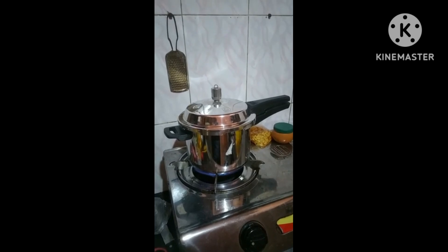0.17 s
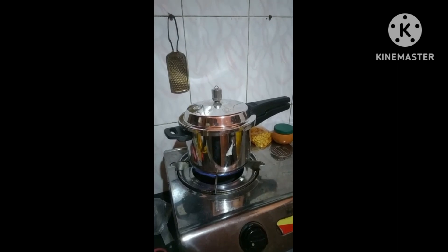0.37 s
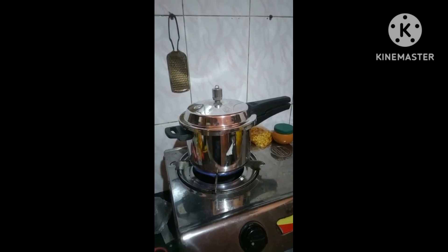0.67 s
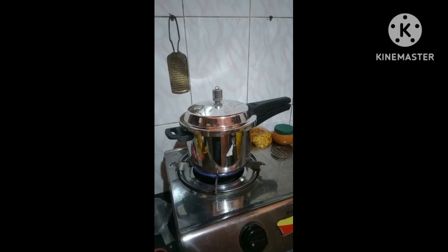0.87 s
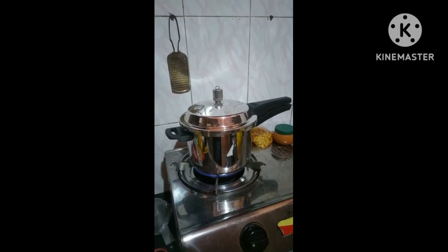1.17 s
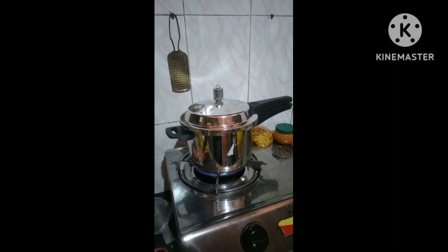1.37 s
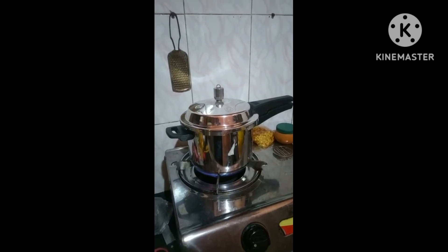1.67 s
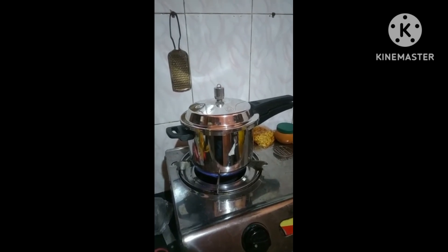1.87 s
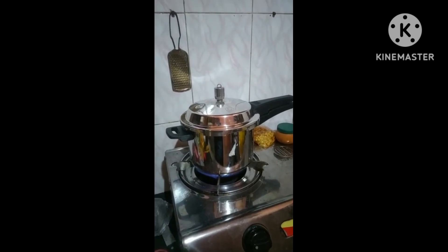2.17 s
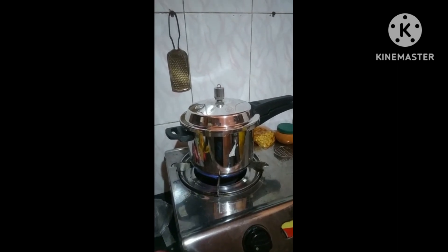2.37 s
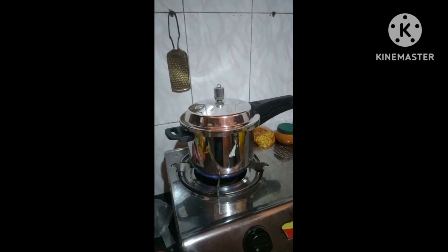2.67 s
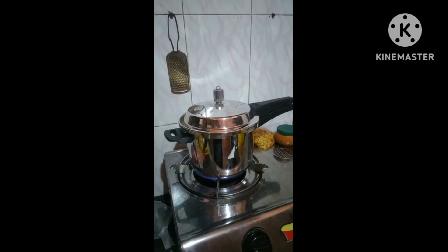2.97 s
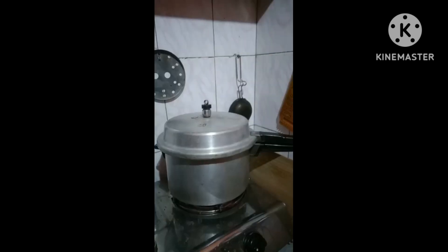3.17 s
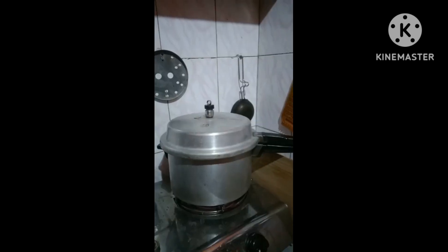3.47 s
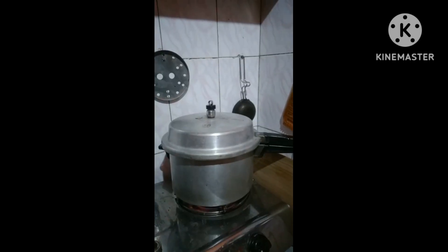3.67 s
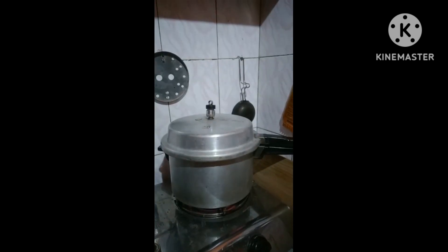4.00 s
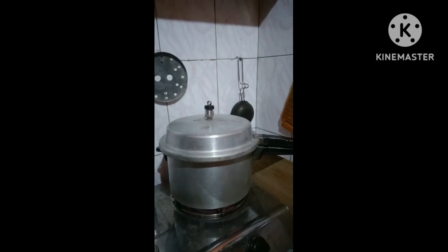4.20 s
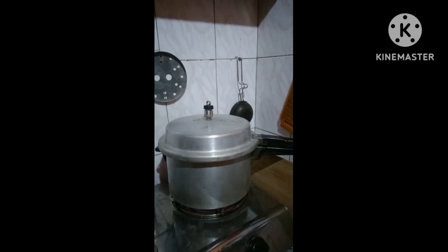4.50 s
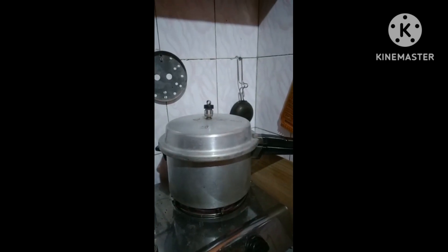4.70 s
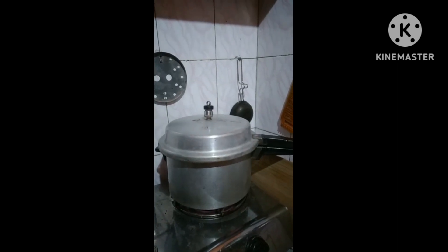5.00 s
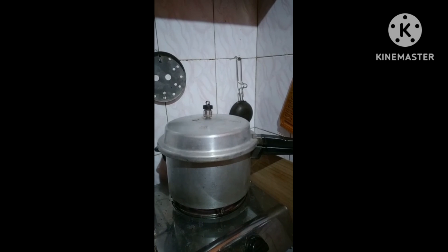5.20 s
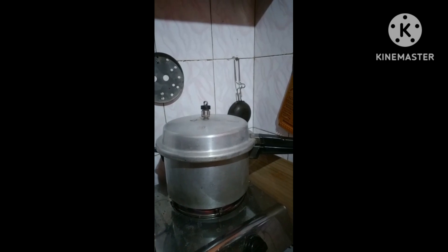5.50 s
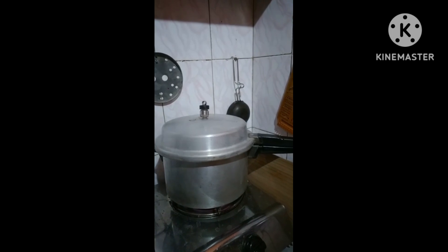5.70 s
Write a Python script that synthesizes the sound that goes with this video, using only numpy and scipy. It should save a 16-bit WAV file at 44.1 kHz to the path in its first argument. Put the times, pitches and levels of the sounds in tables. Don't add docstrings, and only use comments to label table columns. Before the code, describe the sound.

Soft leaking steam in a kitchen, a short silent gap, then an overloaded one-second blast of steam from another cooker that clacks shut to a hiss.

```python
import sys
import numpy as np
from scipy import signal
from scipy.fft import rfft, irfft, next_fast_len
from scipy.io import wavfile
from scipy.ndimage import uniform_filter1d

SR = 44100
rng = np.random.default_rng(int(sys.argv[2]) if len(sys.argv) > 2 else 0)


def gain_from_db(level_db):
    decades = np.asarray(level_db, float) / 20
    return 10 ** decades


def waveform_to_disk(signal):
    frames = np.transpose(np.atleast_2d(signal))
    scaled = np.clip(frames, -1, 1) * 32767
    samples = np.round(scaled).astype(np.int16)
    wavfile.write(sys.argv[1], SR, samples)


N = 257984
T = np.arange(N) / SR
LEFT_LATE_S = 0.011
# start_s, end_s
SILENCE = (3.137, 3.479)


def unit(x):
    return x / np.sqrt(np.mean(x ** 2, axis=-1, keepdims=True) + 1e-20)


def along(points, hz):
    f, db = np.transpose(points)
    return gain_from_db(np.interp(np.log(hz + 1), np.log(f + 1), db))


def wobble(rate, channels=2):
    knots = rng.standard_normal((channels, 9000))
    return np.array([np.interp(T * rate, np.arange(len(k)), k) for k in knots])


def filtered(x, response):
    size = next_fast_len(N + 8192)
    hz = np.fft.rfftfreq(size, 1 / SR)
    return irfft(rfft(x, size) * response(hz), size)[..., :N]


def peaks(modes, hz):
    return np.sqrt(1 + sum(gain_from_db(2 * db) / (1 + (2 * (hz - c) / w) ** 2) for c, w, db in modes))


def bumps(rows):
    s, half, *db = np.transpose(rows)
    coarse = T[::64]
    bells = np.exp(-((coarse - s[:, None]) / half[:, None]) ** 2)
    swells = np.array(db) @ bells
    return np.array([np.interp(T, coarse, swell) for swell in swells])


def stages(levels_db, times):
    out = []
    for (first, leak, blow, rest), late in zip(levels_db, [LEFT_LATE_S, 0]):
        moments = np.add(times, [late, late, 0, 0])
        second = np.interp(T, moments, [leak, blow, blow, rest])
        out.append(np.where(T < SILENCE[0], first, second))
    return np.array(out)


def fades():
    fade_out = np.clip((3.157 - T) / 0.16, 0, 1) ** 1.15
    fade_in = np.clip((T - 3.452) / 0.28, 0, 1) ** 1.32
    return fade_out + fade_in


def hum(tones, unsteady_db):
    sines = sum(np.sqrt(2) * gain_from_db(db) * np.sin(2 * np.pi * hz * T) for hz, db in tones)
    return sines * gain_from_db(unsteady_db * wobble(5.6, channels=1))


# pitch_hz, width_hz, level_db
LEFT_CAVITY = [(5510, 2670, 11), (7060, 1400, 8)]
RIGHT_CAVITY = [(10320, 1400, 11.5), (11600, 1200, 1.3)]


def hiss(colour, flutter_db):
    slow = wobble(6.6, channels=1) + 0.68 * wobble(6.9, channels=1)
    flutter = gain_from_db(flutter_db * (slow + 0.38 * wobble(30)))

    def response(hz):
        return colour(hz) * np.array([peaks(LEFT_CAVITY, hz), peaks(RIGHT_CAVITY, hz)])

    return unit(flutter * filtered(rng.standard_normal((2, N)), response))


# pitch_hz, level_db (per Hz)
FIRST_JET = [(300, -12), (2000, 3.5), (4000, -3.5), (7000, -4.5), (10000, -2), (13000, -3), (16000, 0.5)]
# pitch_hz, width_hz, level_db
WEIGHT_WHISTLES = [(5278, 40, 5), (5735, 50, 9), (5810, 40, 4), (5915, 60, 6), (6003, 40, 4),
                   (6230, 140, 5), (6850, 80, 4), (7180, 90, 4)]


def whistling_valve():
    return hiss(lambda hz: along(FIRST_JET, hz) * peaks(WEIGHT_WHISTLES, hz) ** [[1], [.15]], flutter_db=.5)


# pitch_hz, level_db (per Hz)
LEFT_FOLD = [(15, -5), (100, -13.5), (400, -4), (1200, -1.5), (2000, -3.5), (2600, -8.5), (3300, -16.5),
             (6000, -19.5), (16000, -28)]
RIGHT_FOLD = [(15, -6.5), (100, 0), (400, 1.5), (1200, 4), (1800, 2), (2500, -5), (3300, -15), (6000, -19),
              (16000, -26)]


def fold(rough_db):
    clumps = gain_from_db(rough_db * wobble(1100) + 0.27 * rough_db * wobble(60))
    beats = unit(clumps * rng.standard_normal((2, N)))

    def low(hz):
        return 1 / (1 + (hz / 3000) ** 6)

    def colour(hz):
        return np.array([along(LEFT_FOLD, hz), along(RIGHT_FOLD, hz)])

    roar = filtered(beats, lambda hz: colour(hz) * np.sqrt(low(hz)))
    tail = filtered(rng.standard_normal((2, N)), lambda hz: colour(hz) * np.sqrt(1 - low(hz)))
    return unit(roar + tail)


# first_leak_db, second_leak_db, blowing_db, settled_db
HISS_LEVELS = [(-36.5, -33.5, -22, -39.5), (-36.5, -30, -23, -37.5)]
ROAR_LEVELS = [(-42.5, -29.5, -10.5, -25), (-38.5, -33, -10, -24.5)]
# rise_start_s, risen_s, fall_start_s, settled_s
HISS_TIMES, ROAR_TIMES = (3.915, 3.937, 4.96, 5.035), (3.92, 3.948, 4.908, 5.01)
# time_s, half_length_s, left_db, right_db
HISS_SPITS = [
    (2.955, .025, 4, -0.5),
    (3.77, .07, 1.5, 1.5),
    (3.885, .03, -2, -1.5),
    (3.945, 0.023, 6.5, 5),
    (4.03, 0.046, -16, -3.5),
    (4.29, 0.014, 4, 4),
    (4.61, 0.034, -3, -1),
    (4.95, 0.033, 3, 4.5),
]
# time_s, half_length_s, roar_gain_db, thud_gain_db
STEAM_EDDIES = [(.06, 0.063, 8, 8), (.31, 0.047, 2.5, 5), (.36, 0.086, 5, 3), (.72, 0.056, 2, -1),
                (.88, 0.031, 3.5, 0), (1.06, 0.086, 3, -5), (1.29, 0.075, 6.5, 1), (1.43, 0.048, 5.5, 5),
                (1.66, 0.1, 6.5, 9), (1.87, 0.18, 4, 6), (2.28, .08, 4, 8), (2.55, 0.13, 1.5, -2),
                (2.74, 0.057, 3.5, 0), (2.94, 0.093, 5, 5), (4.02, .07, 2, -3), (5.01, 0.027, 3, -2.5),
                (5.17, 0.093, 5, -1.5), (5.4, 0.11, 3.5, 2.5), (5.6, 0.076, 2, 1.5),
                (5.76, 0.038, 4.5, 2.5)]


def cooker(steam, rough_db):
    hiss_db = stages(HISS_LEVELS, HISS_TIMES) + bumps(HISS_SPITS)
    roar_db = stages(ROAR_LEVELS, ROAR_TIMES) + bumps(STEAM_EDDIES)[0] * [[.1], [1]]
    roar_db = roar_db + [[.6], [1.2]] * wobble(25)
    return fades() * (gain_from_db(hiss_db) * steam + gain_from_db(roar_db) * fold(np.array(rough_db)))


# pitch_hz, level_db
FLAME_RUMBLE = [(15, 4), (60, -0.5), (100, -1), (180, -5.5), (400, -5.5), (800, -16), (2000, -55)]
# first_burner_db, second_burner_db
FLAME_LEVELS = (-66, -35)


def flame():
    rumble = unit(filtered(rng.standard_normal(N), lambda hz: along(FLAME_RUMBLE, hz)))
    return gain_from_db(np.where(T < SILENCE[0], *FLAME_LEVELS)) * fades() ** 0.79 * rumble


# pitch_hz, level_db
BURNER_TONES = [(291, -64), (96.4, -67)]


def burner_hum():
    return (T < 3.05) * hum(BURNER_TONES, 2.0) * gain_from_db([[3], [-3]])


# first_leak_db, second_leak_db, blowing_db, settled_db
THUD_LEVELS = [(-56.5, -60, -19.5, -48), (-55.5, -62, -13, -25)]
# rise_start_s, risen_s, fall_start_s, settled_s
THUD_TIMES = (3.93, 3.965, 4.89, 5.08)


def thud():
    bass = filtered(rng.standard_normal((2, N)), lambda hz: hz / (hz + 25) / (1 + (hz / 250) ** 2))
    thud_db = stages(THUD_LEVELS, THUD_TIMES) + bumps(STEAM_EDDIES)[1] * [[-.1], [1]] + 3.2 * wobble(11)
    return fades() * gain_from_db(thud_db) * unit(bass)


# time_s, half_length_s, level_db
EDDY_THUMPS = [
    (0.058, 0.046, -41.5),
    (1.865, 0.022, -40),
    (2.218, .025, -45),
    (2.289, 0.024, -42),
    (2.91, 0.023, -44),
]


def thumps():
    s, half, db = np.transpose(EDDY_THUMPS)[:, :, None]
    swings = gain_from_db(db) * np.exp(-((T - s) / half) ** 2) * np.sin(2 * np.pi * 84 * (T - s))
    return np.sqrt(2) * swings.sum(axis=0) * [[0], [1]]


def mains_hum():
    return np.interp(T, [3.47, 3.5, 3.6, 3.68], [0, 1, 1, 0]) * hum([(100, -46.5)], 1.5)


# pitch_hz, level_db (per Hz)
SECOND_JET = [(300, -27), (2000, -8), (4200, -4), (5500, -1.5), (7000, -1.5), (10000, -2.5), (13000, -2),
              (16000, -2)]
# pitch_hz, level_db
LEAK_SHADE = [
    [(3000, 6.5), (4500, 0), (8500, 2), (11000, -2), (15000, -24)],
    [(3000, 4), (6500, 1), (8500, 4.5), (12000, -1), (15000, -3.5)],
]
# start_s, end_s
WEIGHT_LIFT = (3.925, 3.945)


def lifting_valve():
    leaking = hiss(lambda hz: along(SECOND_JET, hz) * [along(side, hz) for side in LEAK_SHADE], flutter_db=1.4)
    blowing = hiss(lambda hz: along(SECOND_JET, hz), flutter_db=1.7)
    opened = np.interp(T, WEIGHT_LIFT, [0, np.pi / 2])
    return np.cos(opened) * leaking + np.sin(opened) * blowing


# start_s, left_share, right_share (of full scale), decay_s
WEIGHT_KICKS = [
    (3.475, 0.01, .02, .055),
    (3.945, 0.1, -.23, .028),
    (3.96, -0.4, 0.0046, 0.055),
    (4.2, -0.04, 0.032, .3),
    (4.939, -0.05, 0.57, 0.0015),
    (4.9435, -0.05, -.3, 0.0029),
    (4.963, 0, 0.29, 0.0033),
    (4.9690, 0, -0.39, 0.0025),
    (4.977, 0.14, 0.4, .002),
    (4.9802, -0.65, -.1, 0.0025),
]


def kicks():
    out = np.zeros((2, N))
    for s, left, right, decay in WEIGHT_KICKS:
        u = np.clip(T - s, 0, 1) / decay
        out += np.array([[left], [right]]) * np.e * u * np.exp(-u)
    return out


# pitch_hz, level_db
POT_TONES = [(532.9, -48), (780.6, -46)]


def pot_song():
    singing = np.interp(T, [3.55, 3.7, 3.92, 3.95], [0, 1, 1, 0])
    return singing * gain_from_db(1.0) * hum(POT_TONES, .8)


RESTING_OFFSET = [
    [-.007],
    [-.004],
]


def drift():
    lifted = np.interp(T, [3.95, 4.1, 4.9, 4.95], [0.053, 0.69, 0.65, 0.0])
    wander = unit(filtered(rng.standard_normal((2, N)), lambda hz: 1 / (1 + (hz / 12) ** 4)))
    return RESTING_OFFSET * np.clip((T - 3.6) / .1, 0, 1) + 0.092 * lifted * wander


def scene():
    first = cooker(whistling_valve(), rough_db=[[3.6], [3.6]])
    second = cooker(lifting_valve(), rough_db=[[.8], [2.5]])
    stove = flame() + burner_hum() + pot_song() + mains_hum() + thud() + thumps()
    before = (T < SILENCE[0]) * (first + stove)
    after = (T > SILENCE[1]) * (second + stove + drift() + kicks())
    return before + after


# pitch_hz, level_db
TREBLE_MARGIN = [(2900, -4), (4300, -3.5), (6500, -3.5), (8000, -6), (11000, -6.5), (13000, -10)]


def lose_faint_treble(x):
    top_hz = 15520
    hz, _, z = signal.stft(x, SR, "cosine", nperseg=2048)
    treble = ((hz > 2900) & (hz < top_hz))[:, None]
    power = np.abs(z) ** 2
    band = uniform_filter1d(uniform_filter1d(power, size=4, axis=1), size=2, axis=2)
    share = uniform_filter1d(1. * treble, size=401, axis=0) + .01
    around = uniform_filter1d(power * treble, size=401, axis=1) / share
    strong = band > around * along(TREBLE_MARGIN, hz)[:, None] ** 2
    kept = (strong | ~treble) & (hz < top_hz)[:, None]
    return signal.istft(z * kept, SR, "cosine", nperseg=2048)[1][:, :N]


def low_pass(x):
    return signal.sosfilt(signal.butter(12, 15590, fs=SR, output="sos"), x)


def record(dry):
    clipped = dry / (1 + np.abs(dry / .95) ** 8) ** (1 / 8)
    thinned = lose_faint_treble(clipped)
    mix = thinned * ((T < SILENCE[0]) | (T > SILENCE[1]))
    return low_pass(mix)


dry = scene()
out = record(dry)
waveform_to_disk(out)
```